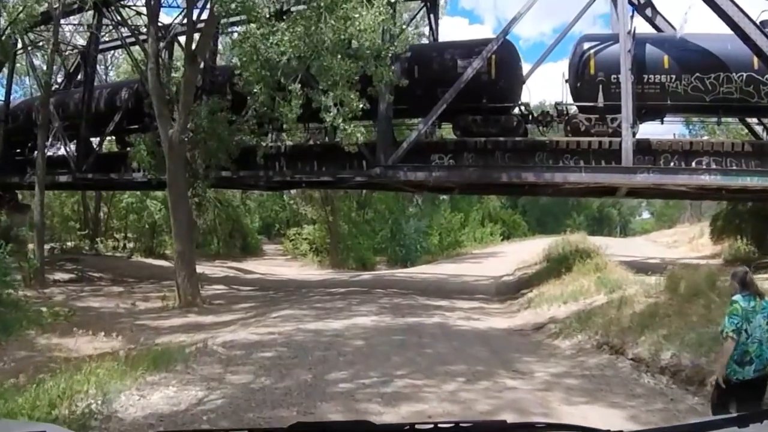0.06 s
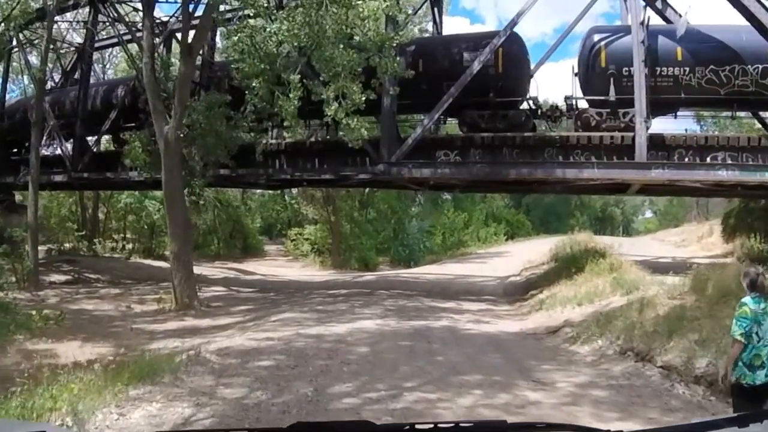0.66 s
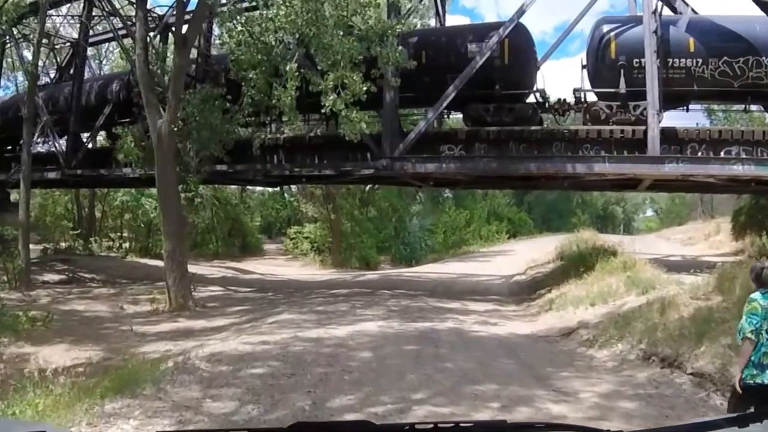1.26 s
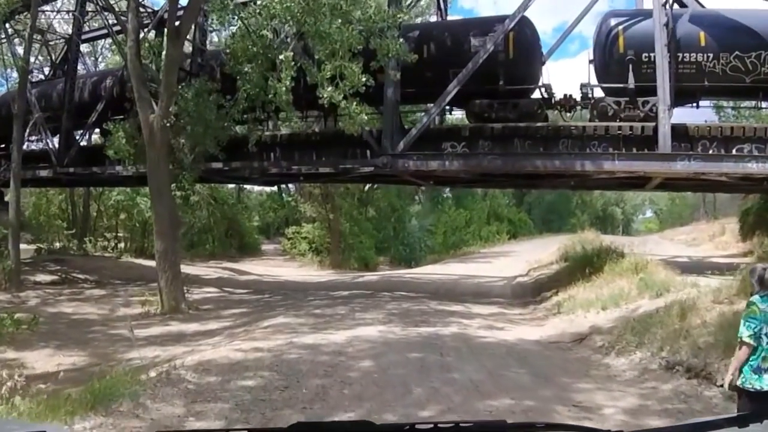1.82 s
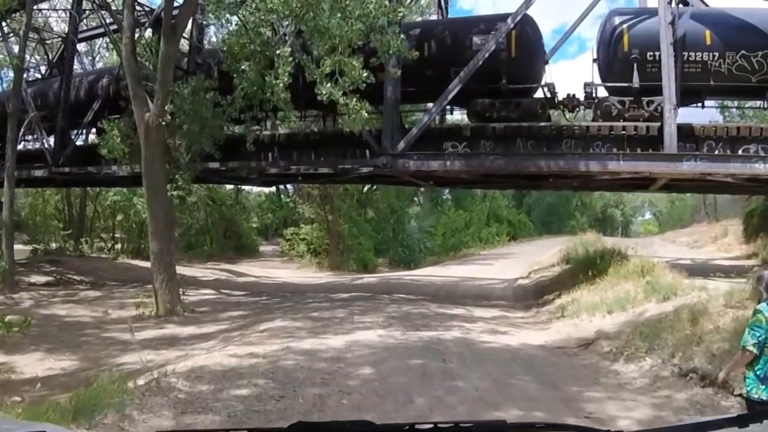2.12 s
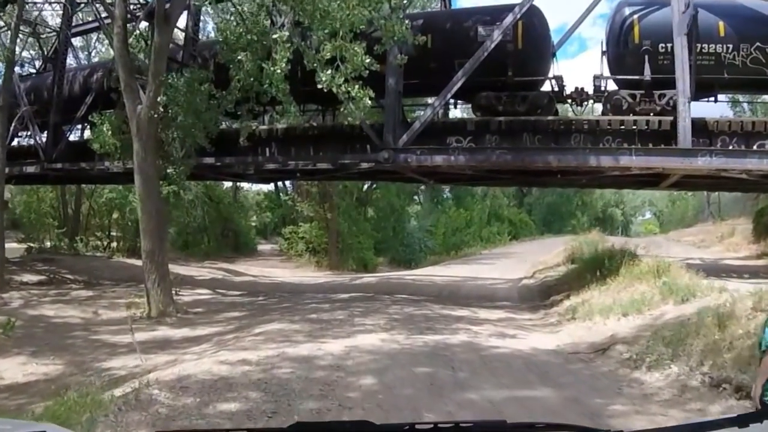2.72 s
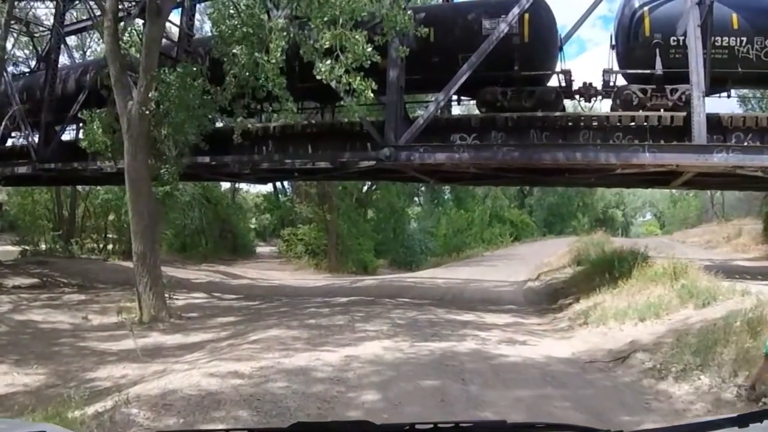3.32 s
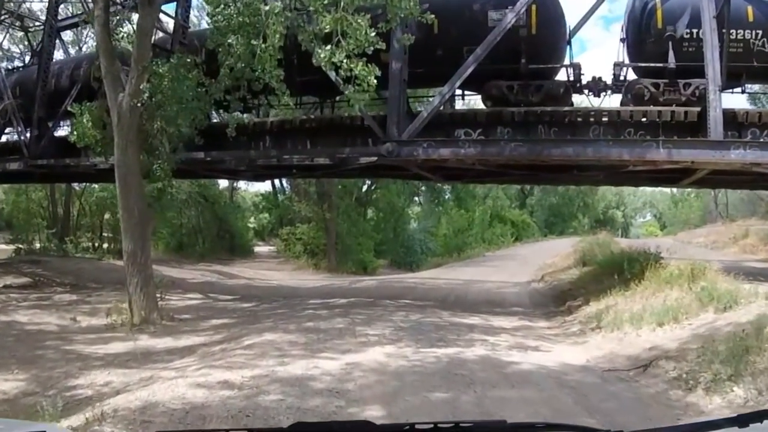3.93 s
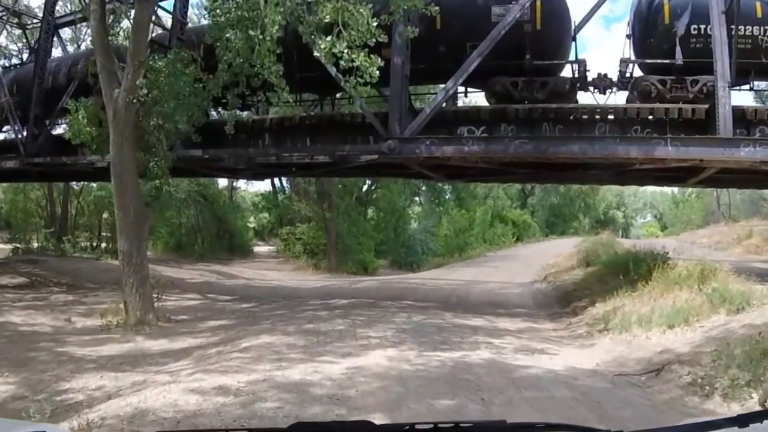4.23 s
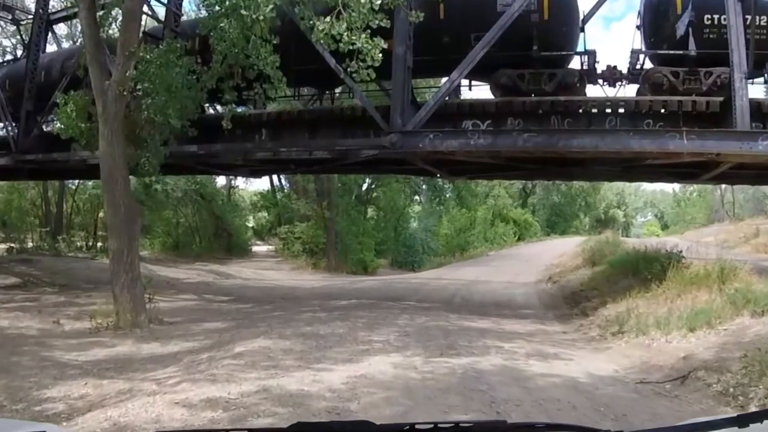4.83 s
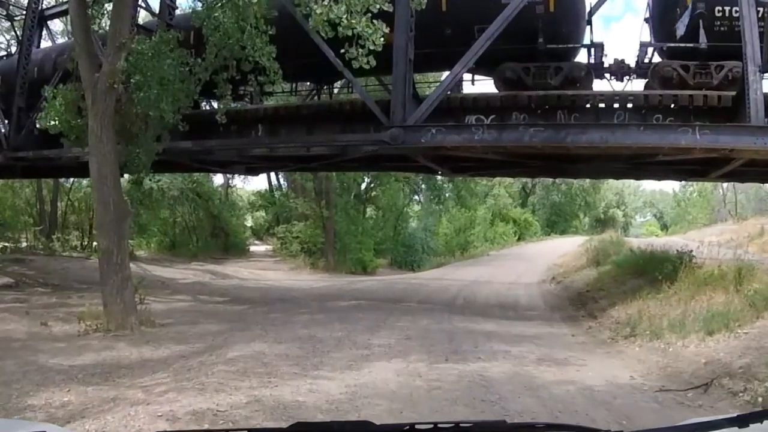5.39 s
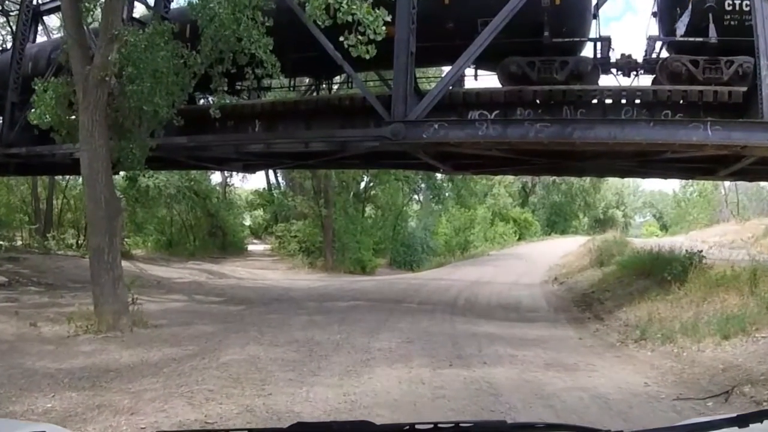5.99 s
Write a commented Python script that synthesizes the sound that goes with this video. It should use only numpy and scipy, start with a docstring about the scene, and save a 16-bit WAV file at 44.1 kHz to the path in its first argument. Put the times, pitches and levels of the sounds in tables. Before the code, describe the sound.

Tank cars roll slowly across a steel bridge overhead. Their wheels make a steady low roar, while the bridge rumbles deeply and swells several times. Couplers and running gear clank at irregular moments, mixed with light rattling, sharp ticks and brief gritty scuffs of wheels on the rail. The rumble eases near the end. It is all heard from inside a vehicle below, dulled by the cabin, with the idling engine humming underneath.

```python
"""Tank cars roll slowly over a steel truss bridge: their wheels roar, and their couplers and
running gear clank, rattle and tick. The wheels also crunch, scuff and rasp on the rail, and the
bridge rumbles as it heaves under the load. We listen from a vehicle on the dirt road below:
its idling engine hums, and its cabin dulls and colours the sound."""
import sys
import numpy as np
from scipy import signal
from scipy.fft import rfft, irfft
from scipy.io import wavfile

SR = 44100
rng = np.random.default_rng(int(sys.argv[2]) if len(sys.argv) > 2 else 0)


def digitize_waveform(pressure):
    """Quantize a signal to 16-bit integers and store it at the path in sys.argv[1].

    Rows of a 2-D input are taken as channels; values are limited to [-1, 1].
    """
    field = np.atleast_2d(pressure).T
    bounded = np.clip(field, -1, 1)
    quanta = np.round(bounded * 32767).astype(np.int16)
    wavfile.write(sys.argv[1], SR, quanta)


N = 271215
TIME = np.arange(N) / SR

def from_db(db):
    """Turn decibels (dB) into a number to multiply by."""
    return 10 ** (np.asarray(db) / 20)

def rms_one(x):
    """Scale a signal so that its average size (rms) is 1."""
    return x / np.sqrt(np.mean(x ** 2) + 1e-20)

def in_time(rows):
    """Join rows that start with a time by straight lines: one curve for each further column."""
    times, *columns = np.transpose(rows)
    return [np.interp(TIME, times, column) for column in columns]

def drift(rate_hz):
    """A smooth random wobble of size about 1; a higher rate wobbles faster."""
    step, warm_up = 40, 2000
    r = np.exp(-2 * np.pi * rate_hz * step / SR)
    chance = rng.standard_normal(N // step + warm_up + 2)
    slow = signal.lfilter([1], [1, -2 * r, r * r], chance)[warm_up:]
    return np.interp(np.arange(N) / step, np.arange(len(slow)), rms_one(slow))

def noise(colour):
    """Noise of size 1, shaped by rows of (Hz, dB) and fading beyond the first and last."""
    hz, db = np.transpose(colour)
    f = np.maximum(np.arange(N // 2 + 1) * SR / N, 1)
    skirts = np.minimum(f / hz[0], 1) ** 2 * np.minimum(hz[-1] / f, 1) ** 2
    gain = from_db(np.interp(np.log(f), np.log(hz), db)) * skirts
    return rms_one(irfft(rfft(rng.standard_normal(N)) * gain, N))

def resonate(x, hz, width_hz):
    """Keep the band around one pitch by filtering twice; the result has size 1."""
    r = np.exp(-np.pi * width_hz / SR)
    b = np.array([1, 0, -1]) * (1 - r * r) / 2
    a = [1, -2 * r * np.cos(2 * np.pi * hz / SR), r * r]
    return rms_one(signal.lfilter(b, a, signal.lfilter(b, a, x)))

def singing(hz, width_hz):
    """A wavering tone: a resonance kept going by random pushes."""
    return resonate(rng.standard_normal(N), hz, width_hz * 2)

def ring(force, hz, t60):
    """Each click starts a tone. Its ring time, t60, is the seconds it takes to fade by 60 dB."""
    r, w = from_db(-60 / (t60 * SR)), 2 * np.pi * hz / SR
    return signal.lfilter([0, np.sin(w)], [1, -2 * r * np.cos(w), r * r], force + 1e-18)

def dying(start, t60, attack_s=0.0014):
    """A loudness curve that jumps up and dies away within a quarter second."""
    out, at, age = np.zeros(N + SR), int(start * SR), np.arange(SR // 4) / SR
    out[at:at + len(age)] = np.minimum(age / attack_s, 1) * from_db(-60 * age / t60)
    return out[:N]

def held(start, length, edge_s):
    """A loudness curve that rises, holds and falls."""
    return np.clip(np.minimum(TIME - start, start + length - TIME) / edge_s + .5, 0, 1)

def grains(per_s, spread_db, t60):
    """A crunchy loudness curve: many short bursts of uneven size."""
    sizes = from_db(spread_db * np.minimum(rng.exponential(1, N), 3))
    clicks = (rng.random(N) < per_s / SR) * sizes
    r = from_db(-60 / (t60 * SR))
    return rms_one(signal.lfilter([1], [1, -r], clicks + 1e-18))

def knocks(tones, per_s, spread_db):
    """Knocks at random times, each ringing its own mix of the given tones."""
    at = np.flatnonzero(rng.random(N) < per_s / SR)
    sizes = from_db(spread_db * np.minimum(rng.exponential(1, len(at)), 3))
    out = np.zeros(N)
    for hz, db, t60 in tones:
        force = np.zeros(N)
        force[at] = sizes * rng.standard_normal(len(at))
        out += from_db(db) * ring(force, hz, t60)
    return rms_one(out)

def add_echoes(x, wet_db, t60):
    """Add a crowd of quick echoes from the girders and the cabin."""
    age = np.arange(SR // 4) / SR
    echoes = rng.standard_normal(len(age)) * from_db(-60 * age / t60) * (age > .004)
    return x + from_db(wet_db) * signal.fftconvolve(x, echoes / np.linalg.norm(echoes))[:N]

# The tones of the engine's hum. Each row: multiple of the cycle rate, relative level in dB.
ENGINE_TONES = [(5, -44), (6, -51), (8, -42), (9, -45.5), (11, -47.5), (12, -45), (13, -48), (14, -57),
                (15, -50), (16, -42), (17, -48.5), (18, -53), (21, -52), (24, -46), (38, -54.5)]

def engine(cycle_hz=5.56, wander=0.00486, uneven_db=2.5, throb_db=2.0, gain_db=-0.5):
    """The idling engine wanders in speed and fires unevenly; one cycle is two turns of the crank."""
    cycles = np.cumsum(cycle_hz * (1 + wander * drift(0.9))) / SR
    hum = np.zeros(N)
    for multiple, db in ENGINE_TONES:
        phase = 2 * np.pi * (multiple * cycles + rng.random())
        hum += from_db(db + uneven_db * drift(1.78)) * np.sqrt(2) * np.sin(phase)
    return from_db(gain_db + throb_db * drift(14.0)) * hum

# The colour of the bridge's rumble. Each row: frequency in Hz, relative level in dB.
RUMBLE_COLOUR = [(10, 2), (16, 4.5), (25, -0.5), (40, -6), (65, -9), (78, -17), (97, -9), (115, -19),
                 (160, -24), (300, -39)]
# The rumble between heaves. Each row: time in seconds, level in dB.
RUMBLE_LEVEL = [(0, -32.5), (4.7, -33.5), (5.7, -44), (6.15, -28.5)]
# The bridge heaves under a load. Each row: time of the peak in seconds, rise in dB.
HEAVES = [(.78, 3.5), (1.42, 7), (2.22, 4.5), (2.52, 7.5), (3.16, 7.5), (3.58, 2.5), (4.22, 7)]

def bridge_rumble(heave_width_s=0.096, throb_db=0.5):
    """The bridge rumbles deeply, throbbing unevenly and swelling with each heave."""
    swell_db = sum(db * np.exp(-((TIME - s) / heave_width_s) ** 2) for s, db in HEAVES)
    level_db = in_time(RUMBLE_LEVEL)[0] + swell_db + throb_db * drift(12.4)
    return from_db(level_db) * noise(RUMBLE_COLOUR)

# The tones of rattling and clanking steel. Each row: pitch in Hz, relative level in dB,
# ring time in seconds.
STEEL_TONES = [(255, -16, 0.12), (363, -9, 0.058), (435, -8.5, 0.06), (506, -3.5, 0.013), (579, -3, 0.07),
               (692, 0, 0.041), (763, -8, 0.11), (919, -5, 0.052), (966, -11.5, 0.079), (1190, -32, 0.071),
               (1520, -8.5, 0.035), (1608, -12.5, 0.04), (1680, -8, 0.017), (2013, -5, 0.026),
               (2215, -7, 0.013)]
# A set of wheels shakes over a rough stretch. Each row: start in seconds, length in seconds,
# relative level of the rattle in dB.
SHAKES = [(0.145, 0.15, -47), (0.556, 0.14, -41), (0.92, 0.06, -47), (4.024, 0.34, -42)]
SHAKE_EDGE_S = 0.018

def rattle(gain_db=-7.0, rise_db_per_s=0.5):
    """Loose gear knocks about quietly, growing slowly louder, with a burst on each shake."""
    quiet = from_db(-51 + rise_db_per_s * TIME)
    bursts = sum(np.maximum(from_db(db) - quiet, 0) * held(start, length, SHAKE_EDGE_S)
                 for start, length, db in SHAKES)
    return from_db(gain_db) * (quiet + bursts) * knocks(STEEL_TONES, per_s=170, spread_db=3.5)

# How the rolling rises and falls. Each row: time in seconds, strength of the roar in dB,
# strength of the rail's ring in dB.
ROLLING_STRENGTH = [(0.0, -43, -53), (0.67, -42.5, -53.5), (1.25, -44.5, -55), (1.93, -45, -58.5),
                    (3.95, -44, -57), (4.1, -41.5, -59.5), (4.36, -42.5, -54), (4.55, -46.5, -58),
                    (5.72, -48, -59), (6.15, -47, -63.5)]

def rolling_swing():
    """How far the two strengths are above their averages in dB; each sound scales this swing."""
    return [curve - curve.mean() for curve in in_time(ROLLING_STRENGTH)]

# The tones of grit under the wheels. Each row: pitch in Hz, relative level in dB, ring time in seconds.
GRIT_TONES = [(1570, 0, 0.027), (1820, 2, 0.0067), (2000, -4, 0.045), (2270, 0.5, 0.023), (3200, 1, 0.0083)]

def grit(level_db=-65.5, growth=1.7):
    """Rough wheels crunch on the rail; the crunch grows faster than the rail's ring."""
    _, rail_swing = rolling_swing()
    return from_db(level_db + growth * rail_swing) * knocks(GRIT_TONES, per_s=110, spread_db=2.0)

# Gritty rasps, likely wheels slipping on the rail. Each row: start in seconds, length in seconds,
# level in dB, pitch in Hz.
RASPS = [(.01, 0.1, -55, 2020), (0.208, 0.074, -56, 1670), (0.347, 0.085, -57.5, 2040),
         (.52, .09, -59, 1990), (0.933, 0.023, -50, 2080), (2.63, 0.084, -63.5, 1800),
         (3.05, 0.092, -60, 1980), (3.24, 0.13, -61, 2090), (4.14, 0.016, -53, 2100),
         (4.54, .03, -60, 1950)]

def rasps(width_hz=420, edge_s=0.02):
    """Steel sticks and slips in uneven bursts, ringing at a different pitch in each rasp."""
    slips = rng.standard_normal(N) * grains(per_s=190, spread_db=6.0, t60=0.019)
    return sum(from_db(db) * held(start, length, edge_s) * resonate(slips, hz, width_hz)
               for start, length, db, hz in RASPS)

# Dry scuffs, likely wheel rims brushing the rail. Each row: start in seconds, length in seconds,
# relative level in dB, extra level for the scrape in dB.
SCUFFS = [(0.257, 0.13, -65, 10.5), (0.865, 0.12, -55.5, 4.5), (0.997, 0.11, -62, -2),
          (1.236, 0.073, -59.5, -4), (1.334, 0.026, -57.5, -4), (1.79, 0.027, -61, 4),
          (1.991, 0.038, -53.5, -6.5), (2.281, 0.073, -58, -1), (3.001, 0.12, -66, 6),
          (3.345, 0.044, -52, -5), (3.422, 0.035, -53.5, 2.5), (3.611, 0.068, -55.5, 5.5),
          (3.686, 0.074, -60, -1), (4.058, 0.032, -52.5, -17), (4.119, 0.031, -52, -19),
          (4.376, 0.085, -64, -6), (4.475, 0.061, -59.5, 4), (4.536, 0.046, -55.5, 1.5),
          (4.587, 0.087, -60, 5), (4.915, 0.027, -51, -13), (4.954, 0.07, -55, -2.5),
          (5.071, 0.015, -53.5, 6), (5.202, 0.016, -60, 9), (5.304, 0.029, -53.5, 5),
          (5.825, 0.019, -51.5, -12), (5.871, 0.052, -59, 2), (5.973, 0.043, -54, 1.5)]
# The colours of a scuff's hiss and scrape. Each row: frequency in Hz, relative level in dB.
HISS_COLOUR = [(3500, 7), (4600, -0.5), (5100, 10), (6400, -1), (7300, -0.5), (8800, -6.5), (11500, -22)]
SCRAPE_COLOUR = [(1200, 8.5), (2000, 13.5), (2700, 4), (3400, 1.5), (4300, 1), (5500, -8)]
# The wheel's tones in the hiss. Each row: pitch in Hz, width in Hz, level against the hiss in dB.
WHEEL_TONES = [(5010, 58, -13.5), (5890, 99, -9), (6310, 330, -4.5), (6900, 54, -14.5)]

def scuffs(hiss_gain_db=-6.0, scrape_gain_db=-2.0, edge_s=0.014):
    """Brief rubs make a grainy hiss with faint wheel tones, over a coarser scrape."""
    hiss_gain, scrape_gain = np.zeros((2, N))
    for start, length, db, extra_db in SCUFFS:
        contact = held(start, length, edge_s)
        hiss_gain += from_db(db + hiss_gain_db) * contact
        scrape_gain += from_db(db + extra_db + scrape_gain_db) * contact
    hiss = noise(HISS_COLOUR) + sum(from_db(db) * singing(hz, width) for hz, width, db in WHEEL_TONES)
    rub = hiss_gain * hiss + scrape_gain * noise(SCRAPE_COLOUR)
    return rub * grains(per_s=600, spread_db=3.0, t60=0.024)

# Sharp ticks. Each row: start in seconds, relative level of the crack in dB, pitch of the ping in Hz,
# relative level of the ping in dB.
TICKS = [(.419, -44, 6960, -51), (0.494, -35.5, 4270, -42), (0.671, -37.5, 3170, -58),
         (1.102, -35.5, 1880, -38), (1.448, -31.5, 1930, -37), (2.185, -39, 3830, -44),
         (2.366, -42, 2200, -45), (2.452, -41, 2150, -29), (2.654, -40, 2000, -47),
         (3.501, -42.5, 5460, -46), (4.622, -43, 6660, -47), (4.69, -36, 4320, -54),
         (5.625, -40.5, 2400, -48), (5.797, -46, 4470, -49)]
# The colour of the crack. Each row: frequency in Hz, relative level in dB.
CRACK_COLOUR = [(900, -2), (1900, 18.5), (2800, 3.5), (4200, 7), (6500, 0.5), (9000, -8.5), (11500, -12)]

def ticks(crack_gain_db=-5.0, rough_db=-4.5, clear_db=-10.0, crack_t60=0.028, ping_t60=0.023):
    """Steel taps steel: a short crack, and a ping that is partly rough and partly clear."""
    crack, chatter, out = noise(CRACK_COLOUR), rng.standard_normal(N), np.zeros(N)
    for start, crack_db, hz, ping_db in TICKS:
        dull_hz = min(3.5 * hz, SR / 3)   # big, low-pitched parts give a duller crack
        dulled = rms_one(signal.lfilter(*signal.butter(1, dull_hz, fs=SR), crack))
        rough = from_db(rough_db) * resonate(chatter, hz, width_hz=620)
        clear = from_db(clear_db) * np.sin(2 * np.pi * hz * (TIME - start))
        out += from_db(crack_db + crack_gain_db) * dying(start, crack_t60) * dulled
        out += from_db(ping_db) * dying(start, ping_t60) * (rough + clear)
    return out

# The colour of the wheels' roar. Each row: frequency in Hz, relative level in dB.
ROAR_COLOUR = [(110, -3.5), (170, 1), (260, -2.5), (400, -3.5), (560, -8.5), (740, -11), (950, -20),
               (1250, -21), (2100, -28), (2700, -29), (4300, -33), (6300, -37.5), (8500, -42.5),
               (11500, -50)]
# Booms and rings stirred up by the rolling. Each row: pitch in Hz, width in Hz, relative level in dB.
ROLLING_TONES = [(135.7, 9.2, -49.5), (206.3, 10.3, -52), (257.3, 7.7, -55), (330.8, 21.5, -58.5),
                 (580.6, 27, -61), (1574, 51, -77.5), (1990, 176, -65.5)]

def rolling_wheels(split_hz=1200, shake_db=2, flutter_db=1.48, rail_flutter_db=1.12):
    """Wheels roar on the bridge, with the cabin booming low down and the rail ringing higher up."""
    roar = from_db(-45.5) * noise(ROAR_COLOUR)
    for hz, width, db in ROLLING_TONES:
        roar += from_db(db) * singing(hz, width)
    low = signal.sosfilt(signal.butter(1, split_hz, fs=SR, output="sos"), roar)
    roar_swing, rail_swing = rolling_swing()
    shaken = sum(held(start, length, SHAKE_EDGE_S) for start, length, _ in SHAKES)
    low_db = 0.54 * roar_swing + shake_db * shaken + flutter_db * drift(7.0)
    rail_db = 1.3 + 0.38 * rail_swing + rail_flutter_db * drift(7.5)
    return from_db(low_db) * low + from_db(rail_db) * (roar - low)

# The colour of the cabin's thump. Each row: frequency in Hz, relative level in dB.
THUMP_COLOUR = [(230, -3.5), (310, 3.5), (480, -1.5), (600, -3), (800, -29)]

def cabin_thumps(blows, gain_db=-2.5, t60=0.16, attack_s=0.005):
    """The cabin panels answer each blow with a low thump that rises and fades more slowly."""
    power = sum((from_db(db + thump_db) * dying(start, t60, attack_s)) ** 2
                for start, db, _, _, thump_db in blows)
    return from_db(gain_db) * np.sqrt(power) * noise(THUMP_COLOUR)

# The colour of the thud that opens each clank. Each row: frequency in Hz, relative level in dB.
THUD_COLOUR = [(200, -15), (420, -0.5), (600, 10.5), (930, -1), (1150, -7), (1550, -10), (2100, -9.5),
               (2800, -19)]

def thuds(blows, low_db=-8.5, high_db=-4.5, split_hz=1000, low_t60=0.065, high_t60=0.022):
    """A blow stirs a crowd of short tones; hard, bright blows stir more high ones, which die first."""
    crowd = noise(THUD_COLOUR)
    low = signal.sosfiltfilt(signal.butter(2, split_hz, fs=SR, output="sos"), crowd)
    low_gain, high_gain = np.zeros((2, N))
    for start, db, bright_db, *_ in blows:
        lift_db = 0.29 * (bright_db + 7.0)
        low_gain += from_db(db + low_db) * dying(start, low_t60)
        high_gain += from_db(db + high_db + lift_db) * dying(start, high_t60)
    return low_gain * low + high_gain * (crowd - low)

def steel_ring(blows, gain_db=-11.0, vary_db=1.0, detune=0.023, bounce_s=0.02, bounce_db=-26.0):
    """Each blow rings a slightly different steel part, then bounces once, faintly."""
    bright_hz, usual_bright_db = 1300, -14.5
    favour_db, favour_octaves = 5, 0.25
    attack_s, smear_s = 0.0007, 0.00131
    hz, tone_db, t60 = np.transpose(STEEL_TONES)[:, :, None]
    highness = 1 / (1 + (bright_hz / hz) ** 6)   # 0 for low tones, 1 for high ones
    t, out = np.arange(SR // 4) / SR, np.zeros(N + SR)
    for start, db, bright_db, favoured_hz, _ in blows:
        strength, pitch = rng.standard_normal((2, len(hz), 1))
        age = np.maximum(t - smear_s * rng.random(hz.shape), 0)   # each tone arrives by its own path
        boost_db = favour_db * np.exp(-(np.log2(hz / favoured_hz) / favour_octaves) ** 2)
        lift_db = highness * (bright_db - usual_bright_db)
        gain = from_db(db + tone_db + boost_db + lift_db + vary_db * strength)
        fade = np.minimum(age / attack_s, 1) * from_db(-60 * age / t60)
        blow = np.sum(gain * fade * np.sin(2 * np.pi * hz * (1 + detune * pitch) * age), axis=0)
        for delay, hit_db in ((0, 0), (bounce_s * (.5 + rng.random()), bounce_db)):
            at = int((start + delay) * SR)
            out[at:at + len(t)] += from_db(hit_db) * blow
    return from_db(gain_db) * out[:N]

# Heavy blows of couplers and running gear. Each row: start in seconds, relative level in dB,
# brightness in dB, pitch the struck part favours in Hz, extra level for the thump in dB.
BLOWS = [(.152, -35.5, 0.5, 262, 0), (.164, -37.5, -4, 544, -2), (.598, -33, -13, 280, -6),
         (.614, -27.5, -10.5, 640, -14), (.66, -36, -16, 700, -8), (.684, -31.5, -3.5, 300, -10),
         (.699, -31, -6, 916, -14), (.714, -27, -20, 916, -9.5), (.860, -22, -8, 740, -14.5),
         (.881, -29, -32, 580, -12), (.904, -24.5, -6.5, 760, -14), (.916, -29, -25, 950, -8),
         (1.074, -37, -29, 377, 2.5), (1.935, -35.5, -3.5, 950, -6), (2.778, -41.5, -28, 262, -2),
         (2.794, -45, -20, 358, -11), (2.816, -38, -15, 400, -5), (2.958, -28.5, -17, 745, -17),
         (3.264, -34, -16, 340, -11), (3.969, -31, -12.5, 730, -15), (4.048, -28.5, -33, 380, -8),
         (4.106, -33, -22, 300, -2), (4.134, -36, -14, 544, -10), (4.177, -32, -12, 300, -5),
         (4.338, -33.5, -18, 470, -6), (4.819, -40, -10, 581, -12), (5.013, -35.5, -0.5, 370, -7),
         (5.160, -40, -20, 431, -12), (5.207, -39, -13, 377, -13), (5.232, -21, -20, 940, -12.5),
         (5.253, -40, 2.5, 800, -4), (5.321, -30.5, -30, 596, -5.5), (6.020, -20, -18, 940, -13.5),
         (6.041, -36, -32, 480, -5)]

def clanks(dull_hz=2750):
    """Each heavy blow makes a ring, a thud and a thump, all dulled by the cabin."""
    struck = steel_ring(BLOWS) + thuds(BLOWS) + cabin_thumps(BLOWS)
    return signal.sosfilt(signal.butter(5, dull_hz, fs=SR, output="sos"), struck)

def scene():
    """The engine, the bridge and the train, mixed into one channel."""
    contacts = add_echoes(clanks() + ticks() + scuffs() + rasps(), wet_db=-6.0, t60=0.083)
    return (engine() + bridge_rumble() + rolling_wheels() + rattle() + grit() + contacts)[None]

def record(dry):
    """Cut away the highest treble steeply, above 11900 Hz."""
    return signal.sosfilt(signal.ellip(12, .1, 90, 11900, fs=SR, output="sos"), dry)

dry = scene()
out = record(dry)
digitize_waveform(out)
```